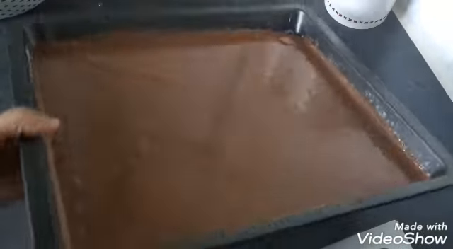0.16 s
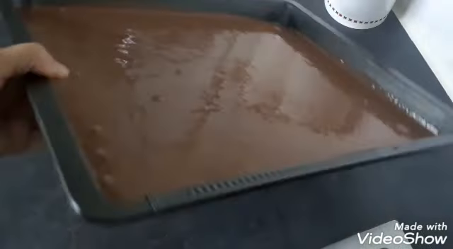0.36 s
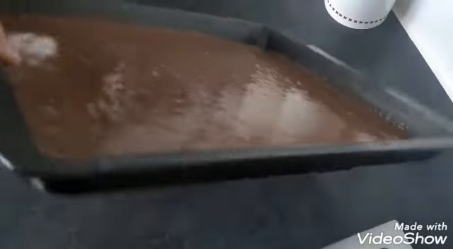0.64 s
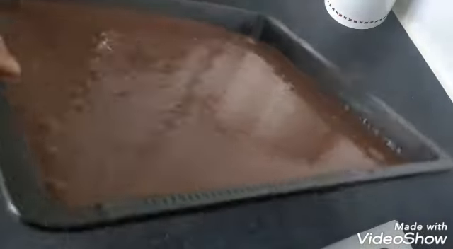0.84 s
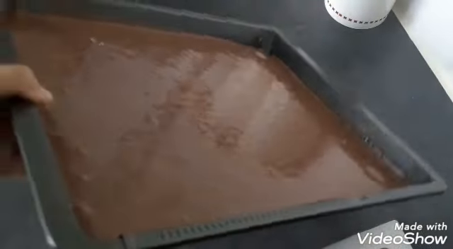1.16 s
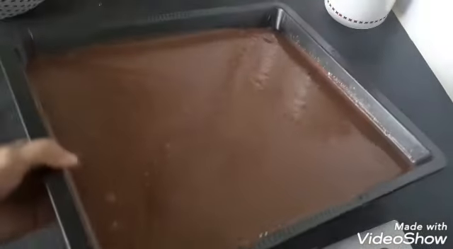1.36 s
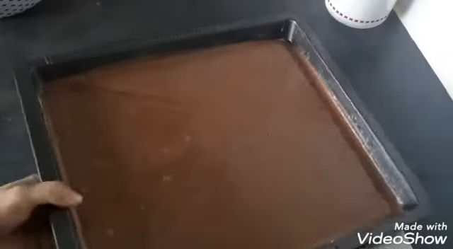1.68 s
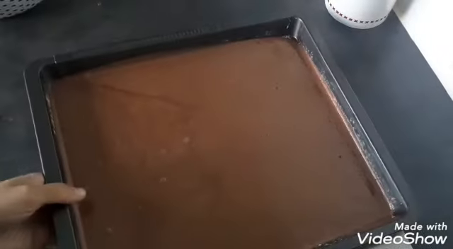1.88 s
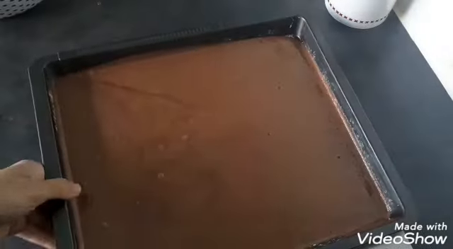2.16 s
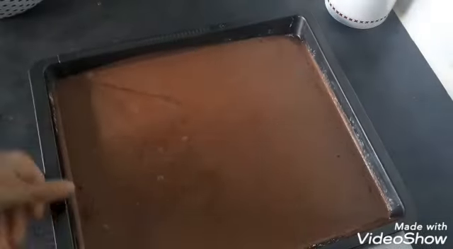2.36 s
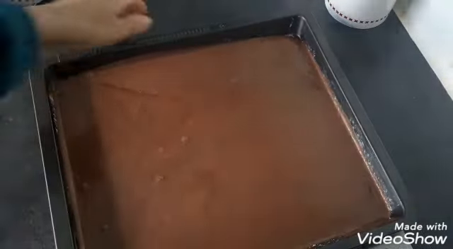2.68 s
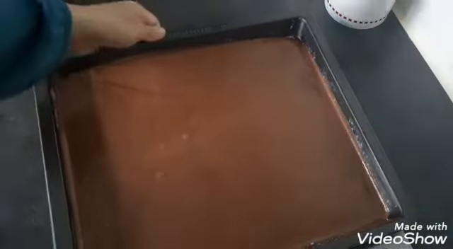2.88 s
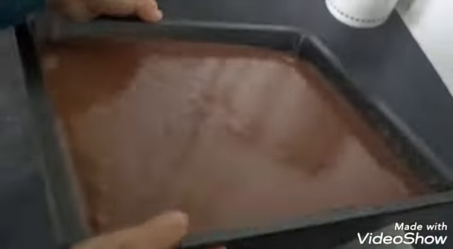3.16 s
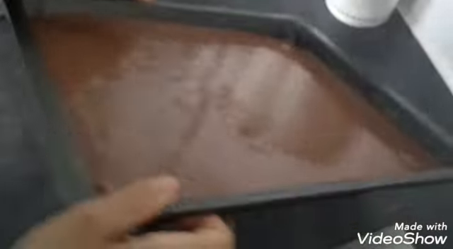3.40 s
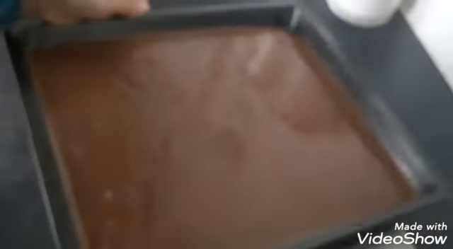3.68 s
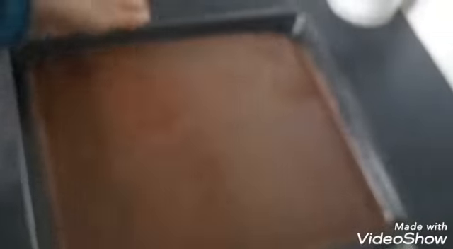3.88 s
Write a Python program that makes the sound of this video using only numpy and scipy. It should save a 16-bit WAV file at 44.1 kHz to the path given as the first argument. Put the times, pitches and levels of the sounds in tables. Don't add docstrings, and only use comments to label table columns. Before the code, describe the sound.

In a quiet kitchen with a faint low hum, fingers tick on a metal rim, then a batter-laden baking tray knocks twice and slaps down with a scrape. Softer bumps and a blunt knock follow, then a pause with faint cloth rustle. A second, harder burst of knocks, deep thud and rattling slides settles quickly. Close stereo phone pickup, short hard-walled reverberation.

```python
import sys
import numpy as np
from scipy import signal
from scipy.fft import rfft, irfft
from scipy.io import wavfile
from scipy.ndimage import uniform_filter1d

SR = 44100
rng = np.random.default_rng(int(sys.argv[2]) if len(sys.argv) > 2 else 0)


def gain_from_db(level_db):
    decades = np.asarray(level_db, float) / 20
    return 10 ** decades


def store_wav(level_fs):
    pcm = np.round(np.clip(np.atleast_2d(level_fs), -1, 1) * 32767)
    wavfile.write(sys.argv[1], SR, pcm.T.astype(np.int16))


N = 178031


def evened(x):
    return x / np.sqrt(np.mean(x ** 2) + 1e-20)


def read(points, hz):
    f, value = np.transpose(points)
    return np.interp(np.log(hz + 1), np.log(f + 1), value)


def add(mix, s, sound):
    part = mix[..., round(s * SR):][..., :sound.shape[-1]]
    part += sound[..., :part.shape[-1]]


def panned(x, pan_db):
    return x * gain_from_db(np.array([[.5], [-.5]]) * pan_db)


def band(x, hz, q):
    return signal.lfilter(*signal.iirpeak(np.clip(hz, 50, 15000), max(q, .1), SR), x)


# f/Hz, likeness/0..1
LIKENESS = [(50, 1), (200, 0.71), (500, 0.47), (1200, 0.22), (3000, 0.063)]


def shared(left, other, hz):
    same = np.clip(read(LIKENESS, hz), -1, 1)[:, None]
    return same * left + np.sqrt(1 - same ** 2) * other


def hiss(colour, patchy_db):
    frames, hz = N // 256 + 5, np.fft.rfftfreq(1024, 1 / SR)
    a, b, c, d, patches = rng.standard_normal((frames, 513, 5)).T
    patches = evened(uniform_filter1d(uniform_filter1d(patches, 10, 0), 12, 1))
    left = a + 1j * b
    z = np.array([left, shared(left, c + 1j * d, hz)])
    z *= gain_from_db(read(colour, hz)[:, None] + patchy_db * patches)
    return evened(signal.istft(z, nperseg=1024, noverlap=768)[1][:, :N])


# f/Hz, level/dB
HUM_COLOUR = [(20, -25.5), (40, -18), (75, -13), (106, 3.5), (144, -18.5), (220, -19), (265, -19.5),
              (305, -10), (480, -23.5), (1300, -27), (1650, -24.5), (2100, -33.5), (2800, -43.5),
              (15400, -52.5)]
# t/s, level/dB
HUM_DRIFT = [(.4, -1.1), (.6, 5), (1.7, 0.5), (2.4, 5), (3.4, 1.5), (4.04, -1.2)]


def hum():
    s, db = np.transpose(HUM_DRIFT)
    level_db = -59.5 + np.interp(np.arange(N) / SR, s, db)
    return gain_from_db(level_db) * hiss(HUM_COLOUR, 1.2)


# t/s, peak level/dB, centre f/Hz
FINGER_TICKS = [
    (0.344, -56, 5240),
    (0.3714, -43, 4760),
    (0.4384, -71.5, 3010),
]


def fingers():
    out, t = np.zeros((2, N)), np.arange(300) / SR
    for s, db, hz in FINGER_TICKS:
        touch = rng.standard_normal((2, len(t))) * gain_from_db(-60 * t / 0.012)
        add(out, s, gain_from_db(db + 7) * band(touch, hz, 2.1))
    return out


# fastest moment t/s, level/dB, build-up t/s, dying away t/s
ARM_MOVES = [
    (.434, -79, .1, .25),
    (1.33, -67, .006, .3),
    (1.505, -67, .1, .33),
    (1.9, -72, .09, .1),
    (2.46, -68.5, .3, .08),
    (2.8, -70, .15, .01),
    (3.558, -62.5, .006, .15),
]
# f/Hz, level/dB
CLOTH_COLOUR = [(1470, -28), (2500, 5.5), (3360, 0.5), (5470, -6), (5910, -2), (11300, -8.5), (12300, -7.5),
                (14400, -8), (15400, -28.5)]


def sleeve():
    t, level = np.arange(N) / SR, 0
    for s, db, rise, fall in ARM_MOVES:
        away = np.where(t < s, (s - t) / max(rise, .001), (t - s) / max(fall, .001))
        level = level + gain_from_db(db - 21 * away)
    return uniform_filter1d(level, 900) * hiss(CLOTH_COLOUR, 1.3)


# t/s, peak level/dB, upper panel level/dB, worktop slab level/dB
CABINET_THUMPS = [(0.451, -57.5, -3, 12), (0.598, -32.5, 1.5, 7), (0.671, -34.5, -19, 9),
                  (0.883, -27.5, 4.5, -17), (0.934, -35, 13, -6), (0.98, -33.5, 5, -22),
                  (1.041, -48.5, 10, -14), (1.29, -42.5, 4, 5.5), (1.313, -31, 4.5, -13),
                  (1.339, -41, 12, -1.5), (1.384, -35, 3.5, -15), (1.449, -44.5, 8, -11),
                  (1.839, -52, 7.5, -27), (1.9, -45.5, -2, -6.5), (1.972, -35, 3.5, -4),
                  (2.039, -41.5, -27, 10), (2.238, -46, 8, 19), (2.816, -32, -8, 0.5),
                  (2.933, -43.5, -6.5, 1.5), (3.085, -15, 5, -3), (3.108, -29, -9, -16.5),
                  (3.17, -37, 5.5, -26), (3.226, -26.5, 9, -29), (3.286, -34.5, 7.5, -30),
                  (3.329, -40, 2, -6), (3.557, -46, 4, 4.5), (3.585, -53, 13, 3)]
# f/Hz, t60/s
CABINET_MODES = [(117.53, 0.3), (162.7, 0.11), (92.9, 0.22), (308, 0.27), (325.5, 0.23), (198, 0.089)]


def cabinet():
    out, t = np.zeros(N), np.arange(SR // 2) / SR
    for s, db, panel_db, slab_db in CABINET_THUMPS:
        shares_db = (0, panel_db, -9.5, slab_db - 7.5, slab_db - 4, panel_db - 4.5)
        ring = sum(gain_from_db(d - 60 * t / t60) * np.sin(2 * np.pi * hz * t)
                   for (hz, t60), d in zip(CABINET_MODES, shares_db))
        add(out, s, gain_from_db(db) * ring * (1 - np.exp(-t / 0.0083)))
    return np.array([out, np.roll(out, shift=-8)])


# f/Hz, level/dB, t60/s
TRAY_MODES = [(292.1, -3.5, 0.23), (317.3, 0, 0.23), (351, -6, 0.17), (464, -6, 0.1), (540.5, -5.5, .2),
              (591, -13, 0.078), (626, 0.2, 0.14), (681, -4.5, 0.087), (841, -11, 0.17), (889, -10, .15),
              (982, -3.5, 0.11), (1008, -13, 0.093), (1214, 6.5, 0.041), (1473, -9.5, 0.057),
              (1520, -12.5, 0.033), (1565, -7, 0.17), (1758, -23, 0.13), (1908, -13.5, 0.19),
              (2284, -20.5, 0.22), (2810, -13.5, 0.049)]


def tray(tilt_db, low_db, spread_db, damping):
    t, out = np.arange(SR // 4) / SR, 0
    for hz, db, t60 in TRAY_MODES:
        chance, turn, start, bend = rng.standard_normal(4)
        db = db + tilt_db * np.log2(hz / 600) + low_db * (hz < 400) + spread_db * chance
        phase = 2 * start + np.array([[0], [turn * min(hz / 700, 2.5)]])
        hz = hz * (1 + .006 * bend)
        twin_hz = hz * (1 + .035 * np.tanh(chance + turn))
        pair = np.sin(2 * np.pi * hz * t + phase) + 0.7 * np.sin(2 * np.pi * twin_hz * t - phase)
        out = out + gain_from_db(db - 60 * damping * t / t60) * pair
    return out / 4.8 * (1 - np.exp(-t / 0.0018))


# t/s, peak level/dB, brightness/dB per octave, lowest modes level/dB, corner sharpness/dB
RIM_KNOCKS = [
    (0.599, -10.5, -2, -5.5, 2.5),
    (0.669, -13.5, -2, -5, 5.5),
    (2.039, -18, -2.5, -12, -1.2),
    (2.239, -21.5, -4, -10, 4.5),
    (2.821, -7.5, -3, -10.5, 0.3),
    (2.9375, -12, -1.5, -12.5, 4.5),
]
# f/Hz, level/dB, t60/s, left-right level/dB, rise t/s
CORNER_MODES = [(1412, 3, 0.0062, 5.4, 0.00041), (553.7, -7.5, 0.033, 10.5, 0.00077),
                (1200, -9.5, 0.019, 11.5, 0.0016), (1686, -8, 0.012, 3, 0.0015),
                (2518, -16, 0.0092, 4.5, .0005)]


def knocks():
    out, t, t_slosh = np.zeros((2, N)), np.arange(2500) / SR, np.arange(SR // 6) / SR
    slosh_fade = gain_from_db(-60 * t_slosh / .19) * (1 - np.exp(-t_slosh / .004))
    for s, db, tilt_db, low_db, corner_db in RIM_KNOCKS:
        add(out, s, panned(gain_from_db(db - 1.5) * tray(tilt_db, low_db + 2.5, 0.53, 1.0), 1.7))

        slosh = rng.standard_normal((2, len(t_slosh))) * slosh_fade
        add(out, s, gain_from_db(db - 5) * band(band(band(slosh, 750, 0.8), 900, 0.6), 1000, 0.55))

        corner = 0
        for hz, d, t60, pan_db, rise in CORNER_MODES:
            bending = gain_from_db(d - 60 * t / t60) * np.sin(2 * np.pi * hz * t)
            corner = corner + panned(bending * (1 - np.exp(-t / rise)) ** 2, pan_db)
        add(out, s, gain_from_db(db + corner_db + 2.5) * corner)

        grit_db = -34 + 1.2 * corner_db
        grit = rng.standard_normal((2, len(t))) * gain_from_db(-60 * t / 0.048) * (1 - np.exp(-t / 0.00062))
        add(out, s, gain_from_db(db + grit_db + 12) * (band(grit, 4000, .8) + 0.31 * band(grit, 7500, .9)))
    return out


# t/s, peak level/dB, centre f/Hz, chatter length t/s, tray ring level/dB
BASE_SLAPS = [(0.8282, -14, 1400, 0.033, -7), (0.845, -25.5, 1600, 0.036, 3.5),
              (0.8797, -16.5, 1470, 0.012, -2), (0.932, -14.5, 1555, 0.012, -9.5),
              (0.944, -21, 1500, 0.02, -12.5), (1.2847, -46, 1100, 0.022, 9), (1.316, -30, 2000, 0.026, -9),
              (1.337, -35, 1610, 0.028, -5.5), (1.416, -43, 1900, 0.026, -7), (1.462, -44, 2140, 0.02, -1),
              (1.9643, -39, 1600, 0.034, -5), (1.9723, -31, 1700, 0.006, -6.5),
              (3.0167, -36.5, 1350, 0.012, -11.5), (3.0308, -39.5, 2500, 0.011, -19),
              (3.0845, -19.5, 1800, 0.01, -1.5), (3.0918, -15.5, 1440, 0.012, -13),
              (3.1114, -28.5, 2020, 0.015, -26.5), (3.128, -30, 2030, 0.0063, 1),
              (3.1885, -22.5, 2270, 0.006, -8.5), (3.2292, -30, 2210, 0.012, -1.5),
              (3.2822, -35, 2213, 0.0043, -2), (3.5552, -47, 3600, 0.024, -4.5)]


def slaps():
    out, t = np.zeros((2, N)), np.arange(4000) / SR
    pan_db = 1.6
    for s, db, hz, length, ring_db in BASE_SLAPS:
        chatter = 0.36 + 1.9 * (rng.random(len(t)) < .025)
        contacts = rng.standard_normal((2, len(t))) * np.exp(-t / max(length, .001)) * chatter
        contacts += 1.43 * rng.standard_normal(len(t)) * np.exp(-t / .0012)

        colour = band(band(contacts, hz, 1.92), hz, 0.25) + 0.17 * band(band(contacts, 2300, 1.5), 5000, .6)
        hardness = np.minimum(gain_from_db(0.63 * (db + 21.5)), 2)
        colour += 0.075 * hardness * band(contacts, 9800, 0.45)
        add(out, s, panned(gain_from_db(db + 6.5) * colour, 1.1 * pan_db))

        push = contacts[:1] / np.linalg.norm(contacts[0])
        ring = signal.fftconvolve(push, tray(2.0, -6.5, 2.2, 2.2), axes=1)
        add(out, s, panned(gain_from_db(db + ring_db + 4.5) * ring, .6 * pan_db))
    return out


# start t/s, length t/s, ring level/dB, scratch level/dB, side wall f/Hz
BASE_DRAGS = [
    (0.832, .095, -31, -33, 712),
    (0.94, .07, -37, -36, 661),
    (2.108, .095, -35, -56, 560),
    (2.95, .085, -28, -40, 640),
    (3.09, .085, -39, -30, 729),
    (3.2, .075, -50, -39, 720),
    (3.28, .04, -52, -48, 650),
]


def drags():
    out, size = np.zeros((2, N)), SR // 6
    for s, length, ring_db, scratch_db, wall_hz in BASE_DRAGS:
        gone = np.arange(size) / SR / max(length, .01)
        fade = np.minimum(gone, 1) ** 1.9
        strength = gain_from_db(1.6 * np.minimum(rng.exponential(1, (3, size)), 3))
        happens = rng.random(size) < 2500 / SR
        slips = evened(strength * happens * rng.choice([-1, 1], (3, size))) * (gone < 1)

        push, body = slips[:1] * gain_from_db(ring_db - 21 * fade), tray(0.65, -0.85, 0.75, 5.3)
        add(out, s, gain_from_db(-6) * signal.fftconvolve(push, body / np.linalg.norm(body[0]), axes=1))
        wall = band(band(np.pad(push[0], (0, 3000)), wall_hz, 6), wall_hz, 3)
        add(out, s, panned(gain_from_db(18.5) * wall, 4.0))
        scratch = slips[1:] * gain_from_db(scratch_db - 19 * fade)
        add(out, s, gain_from_db(8.0) * band(band(scratch, 1800, 1.0), 2500, 0.15))
    return out


# f/Hz, level/dB
TAIL_COLOUR = [(150, -27), (260, -15), (330, -9), (420, -12.5), (600, -1), (1500, -4), (4000, 2.5),
               (9300, 1), (10500, -22.5), (15000, -22)]
# f/Hz, t60/s
KITCHEN_DECAY = [(100, .4), (300, 0.31), (800, 0.39), (2000, 0.38), (5000, 0.34), (12000, 0.25)]


def kitchen(x):
    taps = np.zeros((2, SR // 2))
    at = np.arange(160, SR // 2 - 20, 20)
    at = at + rng.integers(0, 20, (2, len(at)))
    np.put_along_axis(taps, at, rng.choice([-1., 1.], at.shape), 1)
    hz, t, z = signal.stft(taps, SR, nperseg=256)
    z[1] = shared(z[0], z[1], hz)
    decay_db = read(TAIL_COLOUR, hz)[:, None] - 60 * t / read(KITCHEN_DECAY, hz)[:, None]
    tail = signal.istft(z * gain_from_db(decay_db), SR, nperseg=256)[1]
    return signal.fftconvolve(x.mean(0)[None], tail / 12, axes=1)[:, :N]


# f/Hz, level/dB
MIC_RESPONSE = [(3000, 1.08), (6000, -7.5), (9500, -8), (10500, -10), (13000, -9.5), (15000, -22)]


def scene():
    near = fingers() + knocks() + slaps() + drags()
    response = gain_from_db(read(MIC_RESPONSE, np.fft.rfftfreq(N, 1 / SR)))
    near = irfft(rfft(near + kitchen(near), axis=1) * response, N, axis=1)
    return hum() + sleeve() + cabinet() + near


def roll_off(x):
    return signal.sosfilt(signal.butter(12, 15590, fs=SR, output="sos"), x)


def record(dry):
    heard = signal.sosfilt(signal.butter(2, 55.0, "high", fs=SR, output="sos"), dry)
    return roll_off(heard)


dry = scene()
out = record(dry)
store_wav(out)
```